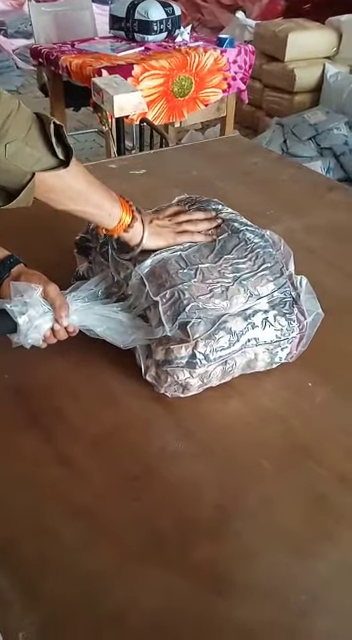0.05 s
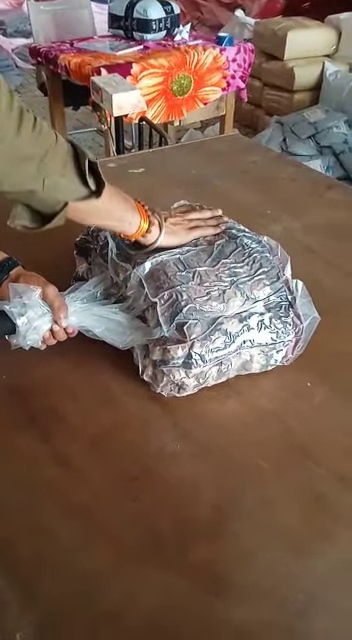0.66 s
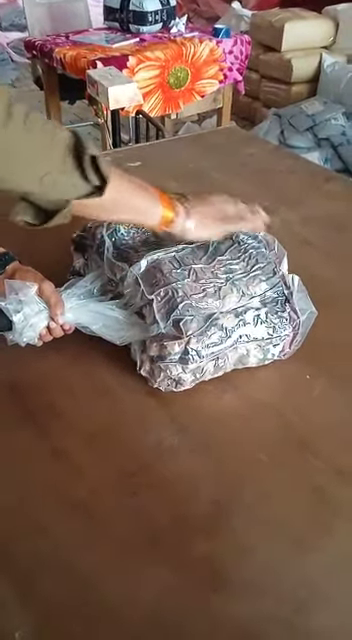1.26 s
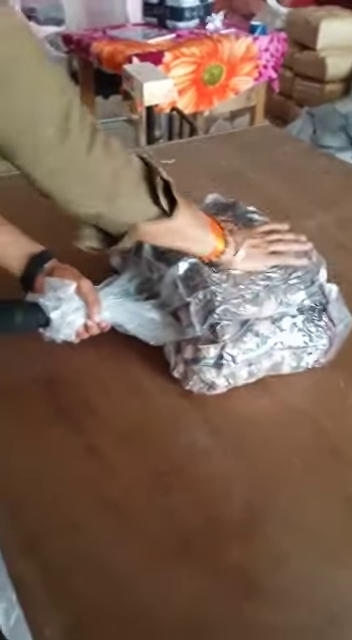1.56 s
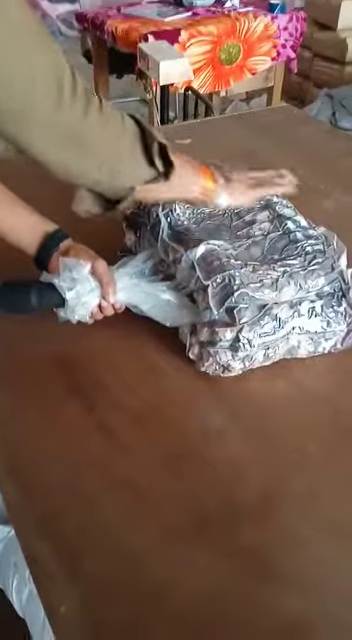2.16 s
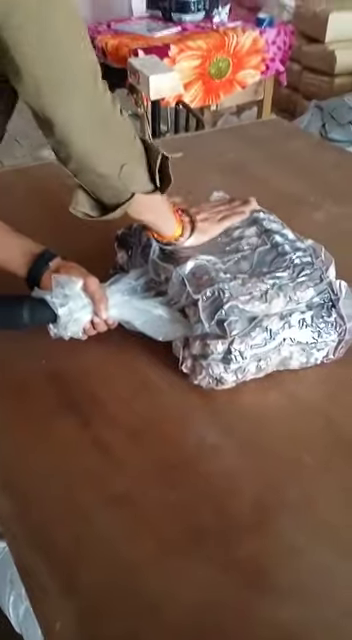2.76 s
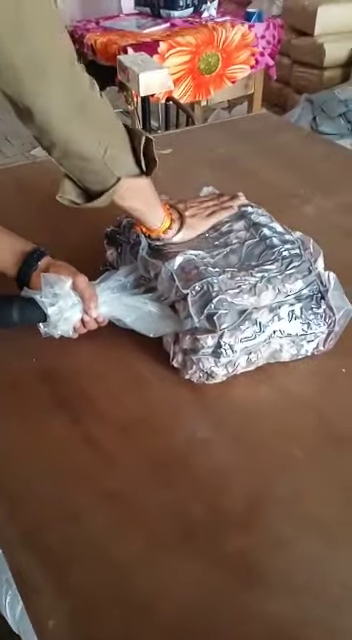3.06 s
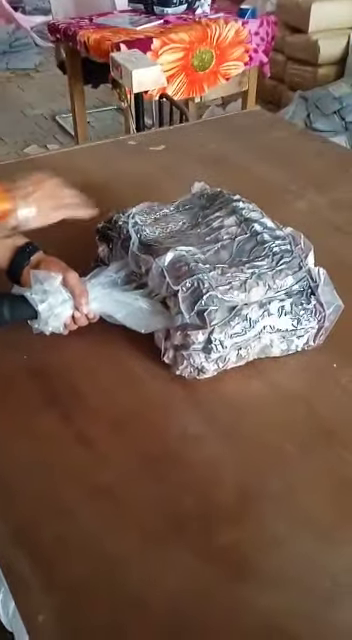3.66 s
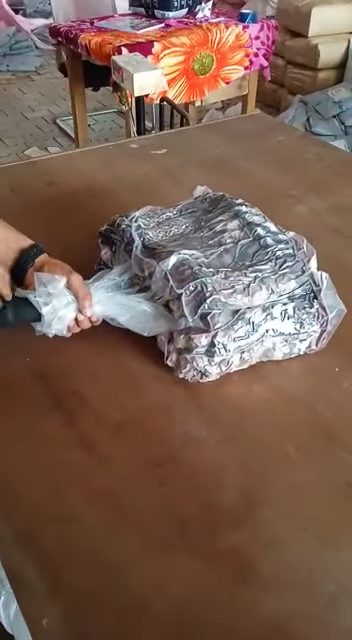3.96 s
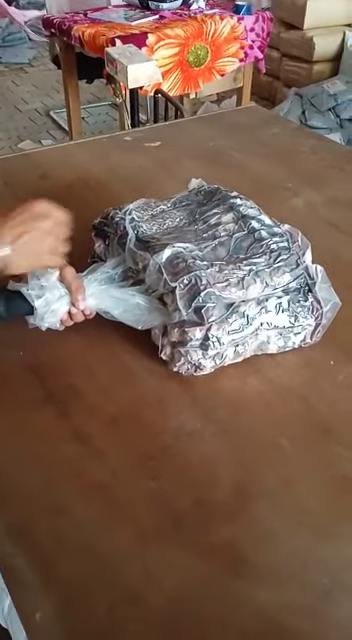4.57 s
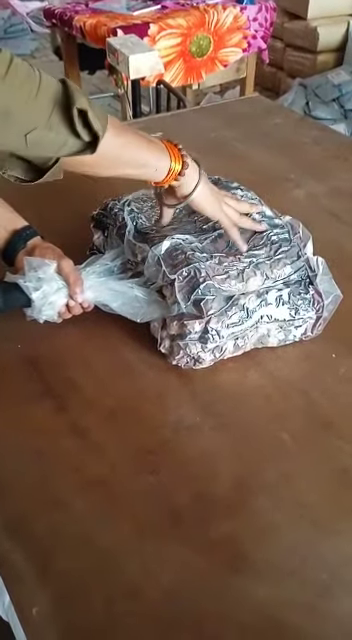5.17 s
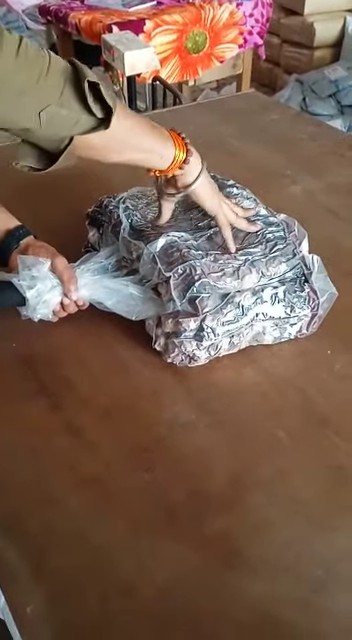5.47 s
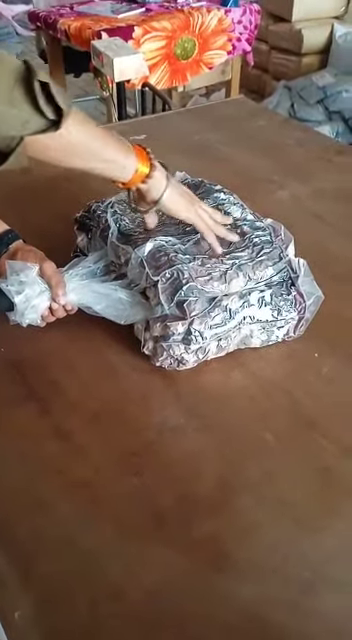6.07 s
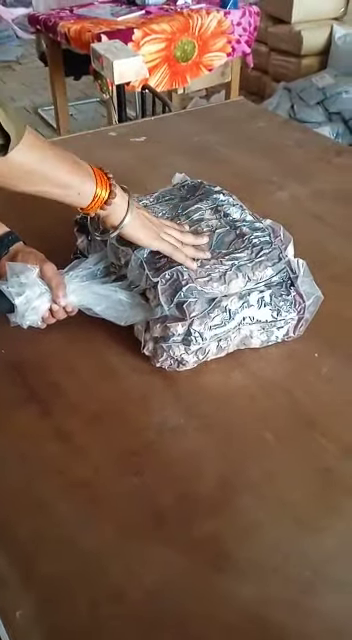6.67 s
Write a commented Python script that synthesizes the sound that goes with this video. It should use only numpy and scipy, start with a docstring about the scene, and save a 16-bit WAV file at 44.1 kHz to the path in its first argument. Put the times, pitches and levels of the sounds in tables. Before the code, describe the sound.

A steady roar and hiss of suction comes from a vacuum hose drawing air out of a plastic bag indoors. The motor's hum and thin, high whine run through it, rising a little as the bag empties. Halfway through, the gathered plastic gives a short, airy whistle. In the last seconds the hiss turns sharper as air slips in past the nozzle.

```python
"""A vacuum machine sucks the air out of a plastic bag of cloth on a table while a hand presses it flat.
The motor hums at shaft speed and its twelve-bladed impeller whistles over a low drone, both rising
a little in pitch as the bag chokes the flow. Air rumbles and roars through the resonances of housing
and hose, hisses at the intake and sings at the gathered neck of the bag.
Once the bag is flat, a bright jet of air leaks in past the nozzle."""
import sys
import numpy as np
from scipy import signal
from scipy.fft import rfft, irfft, next_fast_len
from scipy.io import wavfile

SR = 44100
rng = np.random.default_rng(int(sys.argv[2]) if len(sys.argv) > 2 else 0)


def pcm_store(signal):
    """Save signal as 16-bit PCM."""
    levels = np.round(np.clip(np.atleast_2d(signal), -1, 1) * 32767)
    wavfile.write(sys.argv[1], SR, levels.astype(np.int16).T)


N = 305613


def from_db(db):
    """Decibels to gain."""
    return 10 ** (np.asarray(db) / 20)


def unit_rms(x):
    """Scale to unit power."""
    return x / np.sqrt(np.mean(x ** 2) + 1e-20)


def automation(points):
    """A curve of (time, value) breakpoints, at every sample."""
    return np.interp(np.arange(N) / SR, *np.transpose(points))


def noise(colour):
    """Unit-power noise shaped by the gain curve colour(hz)."""
    size = next_fast_len(N)
    hz = np.maximum(np.arange(size // 2 + 1) * SR / size, 1)
    white = rfft(rng.standard_normal(size))
    return unit_rms(irfft(white * colour(hz), size)[:N])


def drift(rate_hz):
    """Random modulation of spread 1, rolling off above rate_hz."""
    return noise(lambda hz: 1 / (1 + (hz / rate_hz) ** 2))


def resonance(hz, centre_hz, half_width_hz):
    """Gain of a resonance with gently falling skirts, 1 at the peak."""
    return 1 / (1 + ((hz - centre_hz) / half_width_hz) ** 2)


def turbulence(eq, modes=()):
    """Rushing air at unit power: a broad EQ curve plus the resonances it excites."""
    eq_hz, eq_db = np.transpose(eq)

    def colour(hz):
        broad = from_db(np.interp(np.log(hz), np.log(eq_hz), eq_db))
        peak_power = sum((from_db(db) * resonance(hz, f, width)) ** 2 for f, width, db in modes)
        return np.sqrt(broad ** 2 + peak_power)
    return noise(colour)


def tone(cycles, scatter, rate_hz):
    """A sine on a running cycle count; unsteady air scatters some of it into a narrow skirt."""
    angle = 2 * np.pi * (cycles + rng.random())
    in_phase = (1 + scatter * drift(rate_hz)) * np.cos(angle)
    quadrature = scatter * drift(rate_hz) * np.sin(angle)
    return unit_rms(in_phase + quadrature)


# the motor speeds up as the emptying bag chokes the flow: t/s, shaft rate/Hz
SHAFT_SPEED = [(0, 620.8), (.9, 621.3), (1.65, 622.8), (2.4, 627.4), (3.05, 627.6), (5.25, 629.6),
               (5.85, 629.3), (6.93, 630.4)]
# once the bag is flat, air leaks in past the nozzle instead: t/s, leak/0-1
LEAK = [(0, 0.12), (4.0, 0), (5.6, 0.54), (5.9, 1), (6.93, .86)]


def air_level(free_db, choke_db, leak_db):
    """A fader in dB: the free-flow level, plus what full choke and full leak each add."""
    speed = automation(SHAFT_SPEED)
    choke = (speed - speed.min()) / np.ptp(speed)
    return free_db + choke_db * choke + leak_db * automation(LEAK)


# fader of the hum's fundamental: t/s, level/dB
HUM_LEVEL = [(0, -40), (.6, -44), (1.15, -42), (1.5, -35), (2.5, -33), (4.15, -34.5), (4.7, -36.5),
             (6.93, -37)]
# weak overtones: shaft multiple, free-flow level/dB, gain at full choke/dB, gain at full leak/dB
SHAFT_OVERTONES = [(2, -54.5, 6.5, -3.5), (3, -50.5, 3, 1.5), (4, -54, 1, 1), (7, -47, 1.5, -8)]


def shaft_hum(turns):
    """Imbalance shakes the motor once a turn, with faint overtones."""
    hum = from_db(automation(HUM_LEVEL)) * tone(turns, scatter=0.11, rate_hz=21)
    overtones = sum(from_db(air_level(*levels)) * tone(multiple * turns, scatter=0.49, rate_hz=10)
                    for multiple, *levels in SHAFT_OVERTONES)
    return hum + overtones


# fader of the whistle's fundamental: t/s, level/dB
WHISTLE_LEVEL = [(0, -31), (1.15, -32), (1.35, -28), (1.8, -34.5), (2.1, -28), (2.65, -26.5), (5.05, -26.5),
                 (5.9, -32.3), (6.93, -33.5)]


def blade_whistle(turns, blades=12, mains_hz=50):
    """The passing blades whistle, with an octave above, throbbing at each half cycle of the mains."""
    throb = np.sin(2 * np.pi * 2 * mains_hz * np.arange(N) / SR)
    whistle_db = automation(WHISTLE_LEVEL) + 0.47 * drift(rate_hz=3.1)
    whistle = from_db(whistle_db) * tone(blades * turns, scatter=0.11, rate_hz=19)
    octave_db = air_level(free_db=-43, choke_db=1.2, leak_db=1.3)
    octave = from_db(octave_db) * tone(2 * blades * turns, scatter=0.3, rate_hz=22)
    return whistle * (1 + 0.053 * throb) + octave * (1 + 0.15 * throb)


# close-set low partials: f/Hz, level/dB
DRONE_PARTIALS = [(49.2, -78), (76.3, -76), (87.0, -61.5), (99.9, -67), (110.3, -65), (149.0, -66.5),
                  (155.1, -71), (161.2, -64.5), (200.2, -61), (233.0, -67.5)]


def drone():
    """Mains hum and slow vibrations beat against one another."""
    t = np.arange(N) / SR
    return sum(from_db(db) * tone(hz * t, scatter=0.38, rate_hz=4.2) for hz, db in DRONE_PARTIALS)


# EQ of the rumble: f/Hz, relative level/dB
RUMBLE_EQ = [(25, -33), (60, -25), (85, -13), (150, -13.5), (265, -4), (350, -8.5), (490, -0.5), (600, -2),
             (720, -5), (850, -9.5), (1000, -6.5), (1200, -4.5), (1700, -5), (3000, -26)]
# housing resonances: f/Hz, half-width/Hz, relative level/dB
HOUSING_MODES = [(993, 60, -5.5), (1370, 55, -7.5), (1420, 48, 0), (1535, 100, -2)]


def housing_rumble(flow_db):
    """Air rumbles in the housing, giving the sound its body."""
    level_db = air_level(free_db=-38, choke_db=-0.71, leak_db=0.66) + flow_db
    return from_db(level_db) * turbulence(RUMBLE_EQ, HOUSING_MODES)


# EQ of the midrange roar: f/Hz, relative level/dB
ROAR_EQ = [(100, -75), (1100, -52), (1700, -14), (2600, -11.5), (2900, -16.5), (3300, -21.5), (3650, -27.5),
           (6000, -71)]
# hose resonances: f/Hz, half-width/Hz, relative level/dB
HOSE_MODES = [(1800, 54, -7), (1898, 75, 0.5), (2130, 75, -3.5), (2326, 35, 1), (2380, 50, -4),
              (2500, 57, -4)]


def hose_roar(flow_db):
    """Air roars in the hose, fluttering because the flow is slightly unsteady."""
    level_db = air_level(free_db=-31.5, choke_db=-0.42, leak_db=2.9) + flow_db
    flutter_db = 0.84 * drift(rate_hz=19)
    return from_db(level_db + flutter_db) * turbulence(ROAR_EQ, HOSE_MODES)


# EQ of the hiss: f/Hz, relative level/dB
HISS_EQ = [(200, -70), (3000, -23), (3620, -34), (4100, -10), (4900, -12), (5300, -10.5), (5700, -12),
           (7200, -1.5), (7800, -12), (9400, -9.5), (10700, -14), (11400, -15), (12200, -18), (13700, -22),
           (15500, -26)]
# intake resonances: f/Hz, half-width/Hz, relative level/dB
INTAKE_MODES = [(3725, 35, -13.5), (4133, 116, -7), (4610, 120, -6), (5200, 32, -2.5), (5650, 120, 0),
                (5940, 70, 1), (6187, 81, 4), (6360, 90, -6.5), (6745, 75, 1.5), (6970, 60, -3),
                (7060, 100, -3)]


def intake_hiss(flow_db):
    """Air hisses in through the gaps around the nozzle, wavering slowly."""
    level_db = air_level(free_db=-29.5, choke_db=-1.3, leak_db=-3) + flow_db
    waver_db = 0.5 * drift(rate_hz=3)
    return from_db(level_db + waver_db) * turbulence(HISS_EQ, INTAKE_MODES)


# EQ of the bright jet: f/Hz, relative level/dB
JET_EQ = [(500, -70), (5500, -22), (7100, -3), (7800, 3.5), (8700, -1.5), (9400, -6), (10500, -18),
          (13500, -17.5)]
# resonances of the leak: f/Hz, half-width/Hz, relative level/dB
JET_MODES = [(3790, 44, -8), (4960, 45, -7), (7120, 51, 4)]


def leak_jet():
    """Air jets past the nozzle, louder as the leak opens."""
    level_db = air_level(free_db=-37.5, choke_db=-0.6, leak_db=7.3)
    return from_db(level_db) * turbulence(JET_EQ, JET_MODES)


# EQ of the top end: f/Hz, relative level/dB
SIZZLE_EQ = [(2000, -76), (12500, -41), (13900, -22), (14250, -9), (14600, -2), (15100, -6), (15400, -6),
             (15700, 2), (17000, -19)]


def air_sizzle():
    """The highest treble of the rushing air, flickering fast."""
    level_db = air_level(free_db=-33.5, choke_db=-3.5, leak_db=1.7)
    flicker_db = 0.7 * drift(rate_hz=40)
    return from_db(level_db + flicker_db) * turbulence(SIZZLE_EQ)


def bag_neck(pitch_hz=2768, swell_at_s=3.44, swell_width_s=0.14):
    """A breathy pipe note where the gathered plastic meets the hose; it sings out as the hand lets go."""
    level_db = air_level(free_db=-40, choke_db=-0.7, leak_db=1.3)
    swell_db = 6 * np.exp(-((np.arange(N) / SR - swell_at_s) / swell_width_s) ** 2)
    waver_db = drift(rate_hz=5.1)
    note = noise(lambda hz: resonance(hz, pitch_hz, half_width_hz=80))
    return from_db(level_db + swell_db + waver_db) * note


# the flow swells under the first press and sags as the hand shifts: t/s, gain/dB
FLOW_GAIN = [(0, -0.7), (1.1, 1.04), (1.4, -1.5), (1.85, 0), (6.93, 0)]


def scene():
    """Motor and air run throughout, mixed in mono to both channels."""
    turns = np.cumsum(automation(SHAFT_SPEED)) / SR
    flow_db = automation(FLOW_GAIN)
    tones = shaft_hum(turns) + blade_whistle(turns) + drone()
    suction = housing_rumble(flow_db) + hose_roar(flow_db) + intake_hiss(flow_db)
    mix = tones + suction + leak_jet() + air_sizzle() + bag_neck()
    return np.array([mix, mix])


def record(dry, cutoff_hz=15700):
    """A steep high cut on the mix."""
    low_pass = signal.ellip(14, 0.1, 90, cutoff_hz, fs=SR, output="sos")
    return signal.sosfilt(low_pass, dry)


dry = scene()
out = record(dry)
pcm_store(out)
```